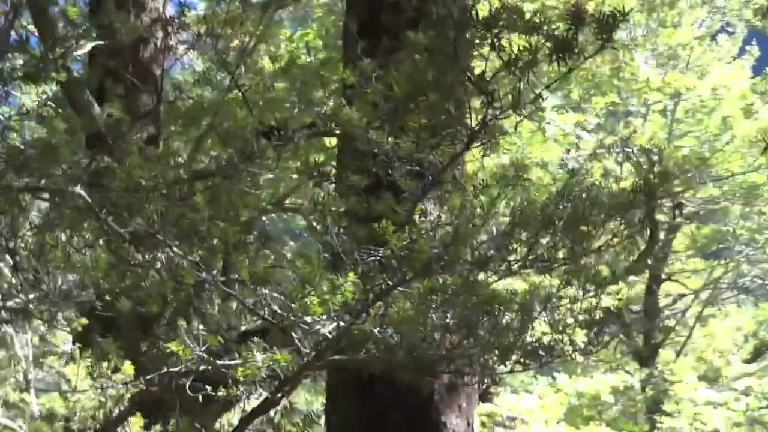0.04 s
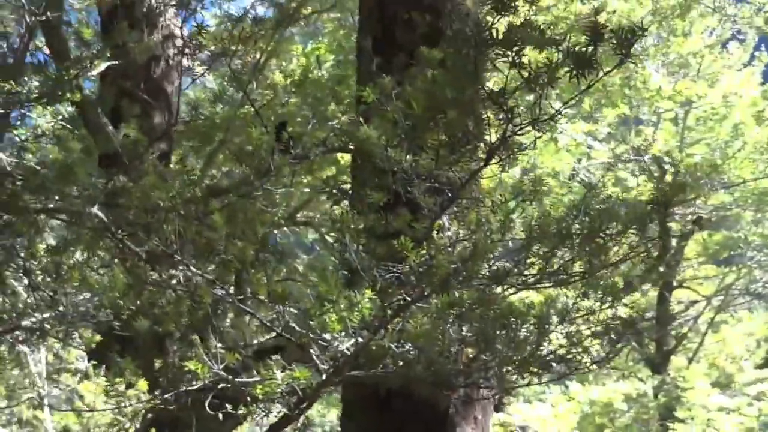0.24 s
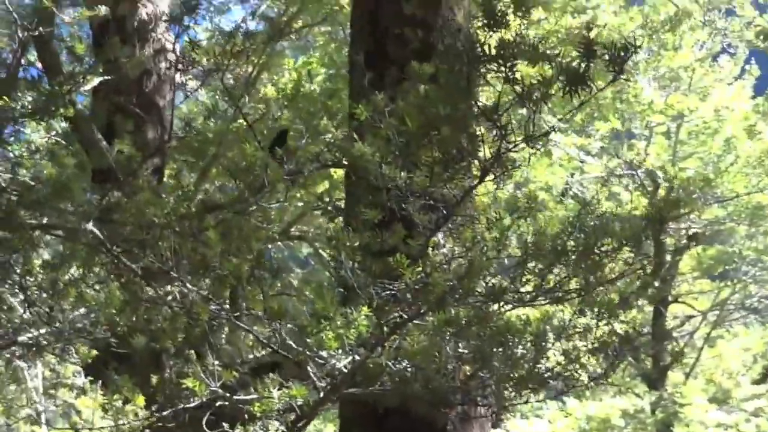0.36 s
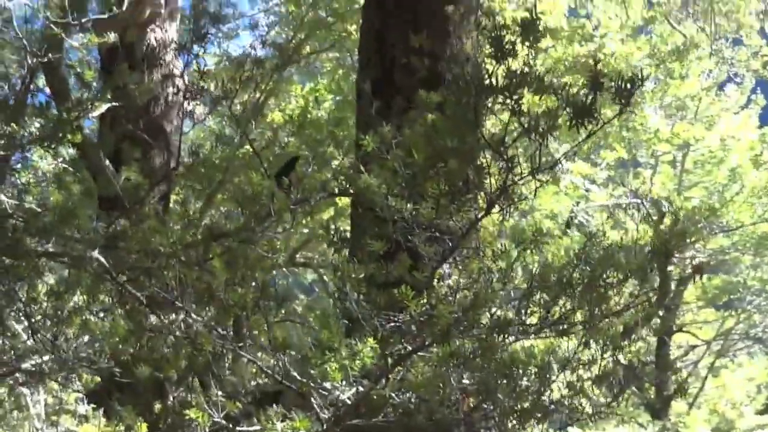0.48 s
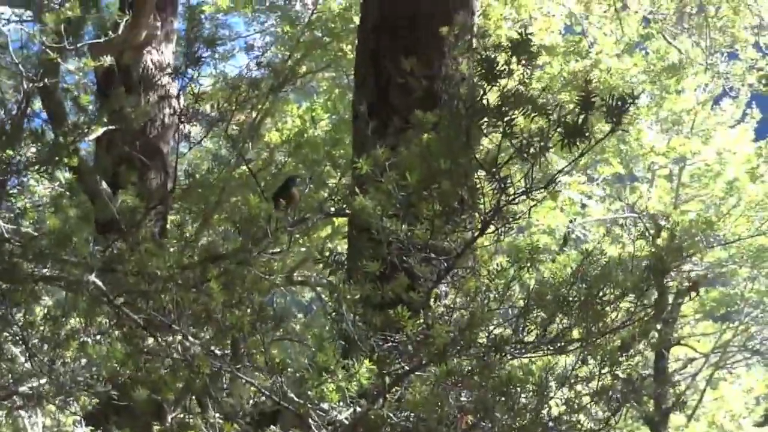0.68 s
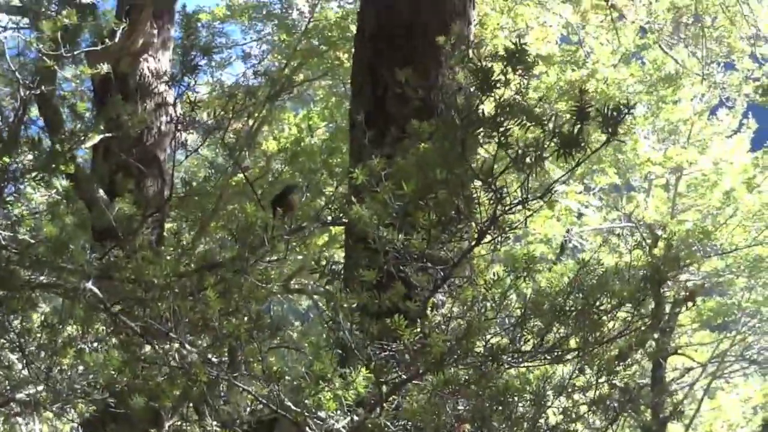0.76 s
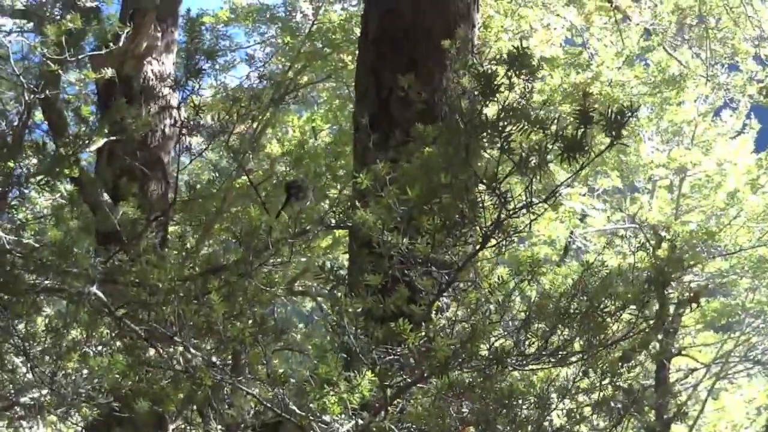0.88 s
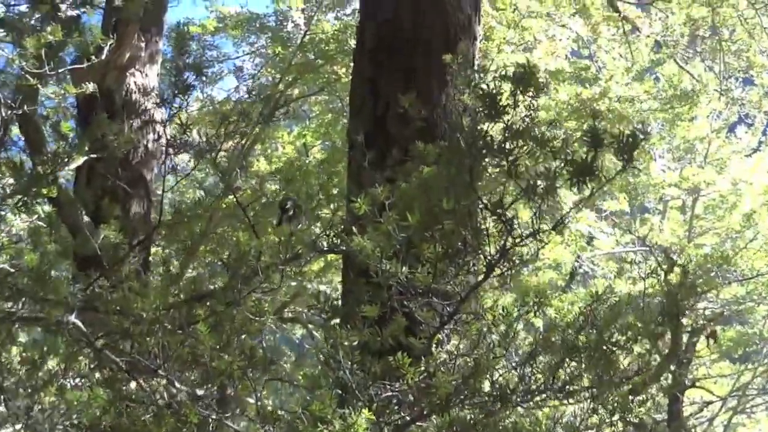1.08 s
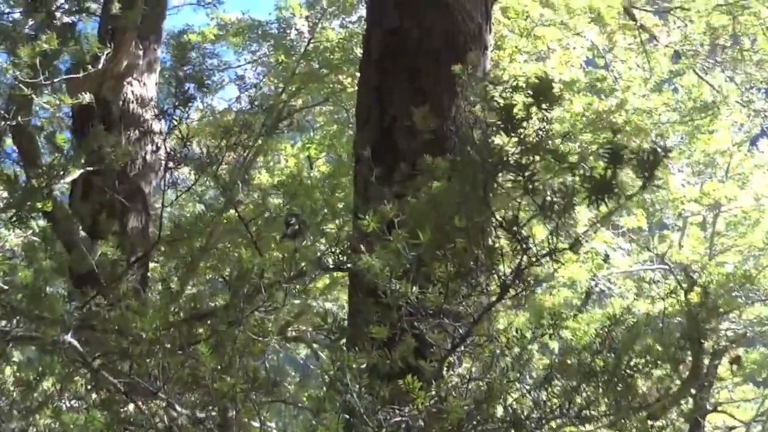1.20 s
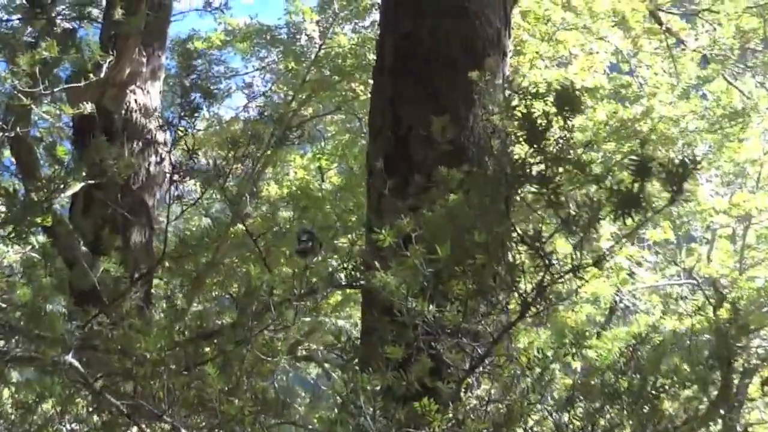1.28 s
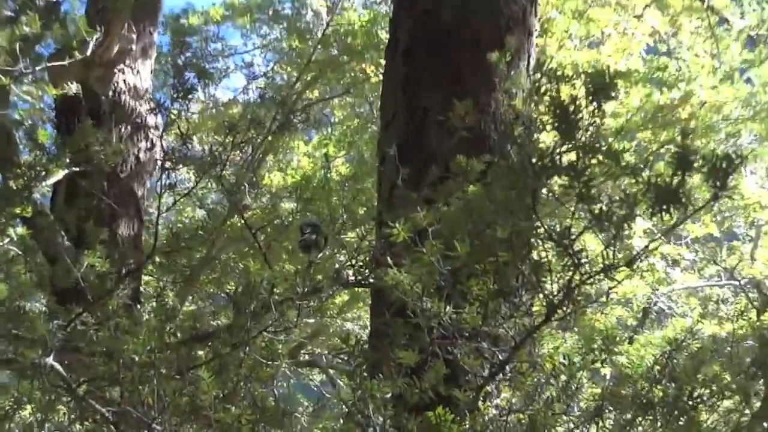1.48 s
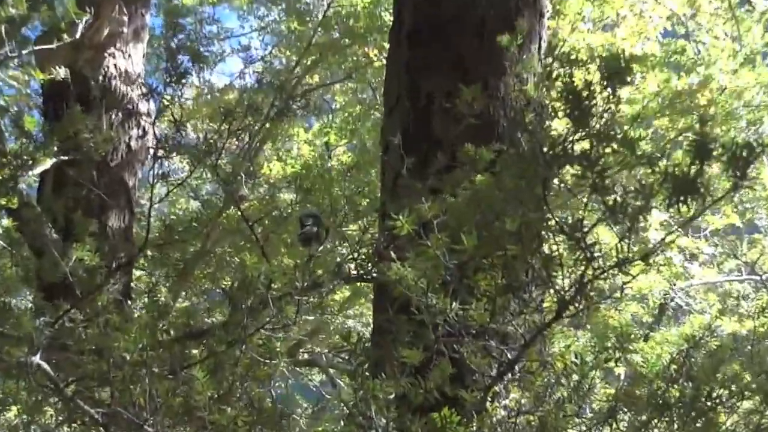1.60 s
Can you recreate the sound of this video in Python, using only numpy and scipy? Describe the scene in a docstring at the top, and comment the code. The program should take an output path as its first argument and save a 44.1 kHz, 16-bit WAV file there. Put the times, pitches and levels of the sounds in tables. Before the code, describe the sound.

A songbird gives a ringing whistle, a falling note, then a rough hiss in a forest.

```python
"""Songbird in a forest

A bird gives one bell-like whistle and a short falling note, both nearly pure tones, and a second later
a rough hiss of air shaped by its throat, over thin held tones. Trunks reflect and foliage scatters the
sound, and the reverberation of the phrase before is still decaying at the start. Behind it all are
faint high ticks, as of camera handling, and the soft steady rush of the forest."""
import sys
import numpy as np
from scipy import signal
from scipy.fft import rfft, irfft, next_fast_len
from scipy.io import wavfile
from scipy.ndimage import map_coordinates

SR = 44100
rng = np.random.default_rng(int(sys.argv[2]) if len(sys.argv) > 2 else 0)


def store_wav(level_fs):
    """Save 16-bit WAV to argv[1]."""
    pcm = np.round(np.clip(np.atleast_2d(level_fs), -1, 1) * 32767)
    wavfile.write(sys.argv[1], SR, pcm.T.astype(np.int16))


N = 72765
TIME = np.arange(N) / SR


def amp(db):
    """Amplitude ratio of a level in decibels."""
    return 10 ** (np.asarray(db) / 20)


def unit(x):
    """Normalisation to rms 1."""
    return x / np.sqrt(np.mean(x ** 2) + 1e-20)


def along(points, hz):
    """Interpolation of (frequency_hz, value) points on a logarithmic frequency axis."""
    return np.interp(np.log(hz + 1), np.log(np.array(points)[:, 0] + 1), np.array(points)[:, 1])


def wobble(rate):
    """Smooth random modulation with `rate` knots a second."""
    return map_coordinates(rng.standard_normal(N), [TIME * rate], mode="wrap")


def filtered(x, response):
    """Linear filtering: the spectrum is multiplied by a frequency response."""
    size = next_fast_len(N + SR // 2)
    return irfft(rfft(x, size) * response(np.fft.rfftfreq(size, 1 / SR)), size)[..., :N]


def noise(response):
    """White noise coloured by a frequency response, at rms 1."""
    return unit(filtered(rng.standard_normal(N), response))


def band_noise(centre_hz, width_hz):
    """Band-pass noise of rms 1."""
    return noise(lambda hz: 1 / (1 + (2 * (hz - centre_hz) / width_hz) ** 4))


def pulse(centre_s, width_s):
    """A Gaussian envelope of height 1."""
    return np.exp(-((TIME - centre_s) / width_s) ** 2)


def swell(start_s, attack_s, end_s, release_s):
    """An envelope of rounded attack, hold and release."""
    rise = np.sin(np.pi / 2 * np.clip((TIME - start_s) / attack_s, 0, 1)) ** 2
    return rise * np.exp(-2 * (np.maximum(TIME - end_s, 0) / release_s) ** 1.6)


def whistle(contour, jitter):
    """Phase, the integral of frequency, and amplitude of a tone that follows a contour."""
    times, hz, db = np.transpose(contour)
    pitch = np.interp(TIME, times, hz) * (1 + jitter * wobble(500))
    level = np.sqrt(2) * amp(np.interp(TIME, times, db, left=-120, right=-120))
    return 2 * np.pi * np.cumsum(pitch) / SR, level


# Spectrum of the rush: frequency_hz, gain_db
RUSH_SPECTRUM = [(15, -78), (25, -45.5), (120, -25.5), (200, -16.5), (299, -8), (392, -6.5), (637, -1.5),
                 (749, -3), (929, -2), (1150, -5), (1320, -3.5), (1590, -5), (1730, -5), (2590, -8),
                 (3490, -10), (5370, -15.5), (9210, -27.5), (13100, -38), (15800, -39.5)]
# Its slow swell: time_s, level_db
RUSH_LEVEL = [(0, -44), (.45, -43.5), (.8, -42), (1.2, -41), (1.65, -41.5)]
# Its side signal relative to the mid: frequency_hz, gain_db
RUSH_WIDTH = [(30, -6), (120, -16.5), (600, -17.5), (1500, -14.5), (4000, -13.5), (12000, -26)]
def forest_rush():
    """Ambient noise: a distant rush, thin in the bass and largely coherent between left and right."""
    shelf_hz, pan_db = 75, .5
    colour = lambda hz: (amp(along(RUSH_SPECTRUM, hz))
                         * (hz ** 2 + shelf_hz ** 2 / 2) / (hz ** 2 + shelf_hz ** 2))
    mid = noise(colour)
    side = filtered(noise(colour), lambda hz: amp(along(RUSH_WIDTH, hz)))
    level = amp(np.interp(TIME, *np.transpose(RUSH_LEVEL)) + 0.12 * wobble(12))
    return level * np.array([mid + side, mid - side]) * amp([[-pan_db], [pan_db]])


# Faint high ticks, as of camera handling: start_s, relative_level_db
FAINT_TICKS = [(0.055, -43), (0.835, -49), (1.09, -44), (1.22, -46), (1.494, -39), (1.506, -30.5),
               (1.543, -40.5), (1.588, -45), (1.628, -46.5), (1.644, -45)]
def faint_ticks():
    """Damped transients: each tick is a burst of high noise that decays exponentially."""
    t60_s = .012
    level = sum((TIME >= start) * amp(db - 60 * np.abs(TIME - start) / t60_s)
                for start, db in FAINT_TICKS)
    return level / 2 * band_noise(centre_hz=9000, width_hz=9000)


# Echoes of the phrase before: centre_hz, width_hz, level_db, t60_s
LINGERING_BANDS = [(1218, 140, -41.5, 0.37), (1640, 40, -43, 0.26), (1785, 93, -40.5, 0.85),
                   (1980, 45, -44, 0.62), (3910, 120, -35.5, 0.24), (8030, 300, -48, 0.37),
                   (11900, 500, -62, .3)]
def lingering_echoes():
    """Reverberant decay: earlier notes persist as narrow bands of noise that fade exponentially."""
    return sum(amp(db - 60 * TIME / t60) * band_noise(hz, width)
               for hz, width, db, t60 in LINGERING_BANDS)


# Reverberation time of the foliage: frequency_hz, t60_s
FOLIAGE_DECAY = [(1000, .42), (4000, 0.78), (12000, .36)]
def foliage_scatter(x):
    """Diffuse scattering: near branches give a short tail of echoes, the foliage a longer one."""
    near_t60_s, near_db, far_db, gap_s = 0.17, -18, -16.5, .008
    hz, age, spectra = signal.stft(rng.standard_normal((2, SR * 3 // 4)), SR, nperseg=256)
    far_t60_s = along(FOLIAGE_DECAY, hz)[:, None]
    near = signal.istft(spectra[0] * amp(-60 * age / near_t60_s), SR, nperseg=256)[1]
    far = signal.istft(spectra[1] * amp(-60 * age / far_t60_s), SR, nperseg=256)[1]
    tail = amp(near_db) * near / np.linalg.norm(near) + amp(far_db) * far / np.linalg.norm(far)
    return signal.fftconvolve(x, np.pad(tail, (int(gap_s * SR), 0)))[:N]


# Reflections from the nearest trunks: delay_s, gain_db
TRUNK_REFLECTIONS = [(.0105, -11), (.019, -18.5), (.056, -26.5)]
def trunk_echoes(x):
    """Early reflection: each trunk returns a delayed, weaker copy of the sound."""
    return filtered(x, lambda hz: sum(amp(db) * np.exp(-2j * np.pi * hz * delay)
                                      for delay, db in TRUNK_REFLECTIONS))


# Partials of the bell note among the trees: pitch_hz, level_db, late_t60_s
RING_PARTIALS = [(3814, -18, 0.58), (7750, -38, .5), (11540, -45, .4), (15300, -57, .4)]
def bell_reverberation():
    """Interference of overlapping echoes: each partial flutters as it drops fast, then fades slowly."""
    start_s, rise_s, early_t60_s, late_db = .154, 0.0086, 0.2, -10
    flutter_db, flutter_rate, drift_rad = 2.7, 110, 0.44
    fundamental_hz = RING_PARTIALS[0][0]
    age = np.maximum(TIME - start_s - rise_s, 0)
    out = np.zeros(N)
    for hz, db, t60 in RING_PARTIALS:
        fade = np.hypot(amp(-60 * age / early_t60_s), amp(late_db - 60 * age / t60))
        phase = 2 * np.pi * hz * TIME + drift_rad * hz / fundamental_hz * wobble(flutter_rate)
        out += amp(db + flutter_db * wobble(flutter_rate)) * fade * np.sin(phase)
    return out * np.clip((TIME - start_s) / rise_s, 0, 1) ** 2


# Thin tones around the hiss: start_s, end_s, first_pitch_hz, last_pitch_hz, level_db, roughness
HELD_TONES = [(1.17, 1.277, 1622, 1618, -42, 0.31), (1.281, 1.457, 1615, 1566, -40, 0.43),
              (1.287, 1.453, 1705, 1690, -45, 0.6), (1.473, 1.515, 892, 867, -42.5, 0.28),
              (1.477, 1.523, 667, 637, -49, 0.4)]
def held_tones():
    """Beating: the two sides of the syrinx give close pitches that interfere where they overlap."""
    edge_s = 0.0044
    out = np.zeros(N)
    for start, end, first_hz, last_hz, db, roughness in HELD_TONES:
        phase = 2 * np.pi * np.cumsum(np.interp(TIME, [start, end], [first_hz, last_hz])) / SR
        tone = unit(np.sin(phase + roughness * wobble(120)) * (1 + roughness * wobble(150)))
        out += amp(db) * swell(start, edge_s, end, edge_s) * tone
    return out


# Spectrum of the air in the throat: frequency_hz, gain_db
THROAT_SPECTRUM = [(800, -16), (1250, 1.5), (1900, -3.5), (2400, -5), (3700, -3), (4600, -1.5), (5800, -2),
                   (7200, -7), (9000, -9.5), (12200, -12.5), (12900, -22), (15700, -32)]
# Spectrum of the jet: frequency_hz, gain_db
JET_SPECTRUM = [(1000, -35), (3500, -11.5), (4600, -7.5), (6500, -1), (8900, 0.5), (9800, -6), (12000, -12),
                (13000, -11), (15700, -14)]
# Narrow throat resonances, added to a flat response: centre_hz, width_hz, gain_db
THROAT_RESONANCES = [(1933, 79, 1.5), (4486, 150, 0.5), (5300, 260, -6.5), (5900, 130, -3),
                     (6570, 70, -1.5), (7340, 100, -5.5), (8350, 60, 3), (8880, 160, -7.5), (11300, 80, -4)]
def hiss():
    """Source and filter: rough air excites the throat, then a brighter jet joins as the bill opens."""
    def air(spectrum, low_cut_hz=1000):
        def response(hz):
            peaks = sum(amp(db) / (1 + (2 * (hz - centre) / width) ** 2)
                        for centre, width, db in THROAT_RESONANCES)
            return amp(along(spectrum, hz)) * (1 + peaks) * hz ** 3 / (hz ** 3 + low_cut_hz ** 3)
        return noise(response)

    throat = swell(start_s=1.238, attack_s=.046, end_s=1.355, release_s=.125) * air(THROAT_SPECTRUM)
    jet = swell(start_s=1.26, attack_s=.11, end_s=1.425, release_s=.088) * air(JET_SPECTRUM)
    roughness = amp(-0.9 * wobble(260))
    return (amp(-29.5) * throat + amp(-33.5) * jet) * roughness


# Contour of the falling note: time_s, pitch_hz, level_db
FALL_CONTOUR = [(.219, 1990, -55), (.228, 1907, -24.5), (.235, 1830, -16.5), (.242, 1663, -15.5),
                (.249, 1480, -24.5), (.256, 1169, -32), (.266, 1173, -29), (.28, 1171, -36),
                (.298, 1150, -53), (.36, 1140, -52)]
# Its overtones at their strongest: harmonic_number, relative_level_db
FALL_HARMONICS = [(2, -24), (3, -40.5), (6, -44), (7, -37), (8, -55.5)]
def falling_note():
    """Frequency glide: a tone slurs down and settles, with frayed harmonics in mid-fall."""
    phase, level = whistle(FALL_CONTOUR, jitter=0.0054)
    pressure = pulse(centre_s=.24, width_s=.009)
    fray_rad = .25
    overtones = sum(amp(db) * np.sin(k * (phase + fray_rad * wobble(500))) for k, db in FALL_HARMONICS)
    return level * np.sin(phase), level * pressure * overtones


# Contour of the bell note: time_s, pitch_hz, level_db
BELL_CONTOUR = [(.072, 3970, -56.5), (.089, 3875, -25.5), (.1, 3860, -16.5), (.113, 3792, -11),
                (.13, 3826, -10), (.143, 3807, -10.5), (.153, 3849, -11), (.159, 3894, -16.5),
                (.168, 3790, -42)]
# Its overtones under full pressure: harmonic_number, relative_level_db
BELL_HARMONICS = [(2, -26), (3, -22.5), (4, -36.5)]
# Rough tones between the harmonics as the voice cracks: frequency_ratio, relative_level_db
CRACK_PARTIALS = [(1.5, -49.5), (2.5, -40.5), (3.5, -48)]
def bell_note():
    """Nonlinear oscillation: under pressure a nearly pure whistle gains harmonics and briefly cracks."""
    rasp_db, flutter_db, relaxed_db, fray_rad = -32.5, 3, -14, 1.6
    phase, level = whistle(BELL_CONTOUR, jitter=0.0017)
    pressure = pulse(centre_s=0.1503, width_s=.014)
    rasp = amp(rasp_db) * pressure * noise(lambda hz: 1 / (1 + (hz / 700) ** 2))
    tone = level * np.sin(phase) * (1 + rasp)
    overtones = sum(amp(db + flutter_db * wobble(140)) * np.sin(k * phase) for k, db in BELL_HARMONICS)
    brightness = np.sqrt(level / level.max()) * amp(relaxed_db * (1 - pressure))
    crack = sum(amp(db) * np.sin(k * phase + fray_rad * wobble(900)) for k, db in CRACK_PARTIALS)
    crack *= pulse(centre_s=.151, width_s=0.0077)
    return tone, level * (brightness * overtones + crack)


# Side signal of the two whistled notes: frequency_hz, gain_db
BIRD_SIDE = [(1200, -24.5), (3800, -28)]
def scene():
    """Superposition: the bird straight ahead, its echoes and the forest's rush add in mid-side stereo."""
    bell, bell_overtones = bell_note()
    fall, fall_overtones = falling_note()
    voice = bell_overtones + fall + fall_overtones + held_tones() + hiss()
    into_foliage = voice + amp(-12) * bell + amp(1.5) * bell_overtones
    mid = bell + bell_reverberation() + voice + trunk_echoes(voice) + foliage_scatter(into_foliage)
    mid += lingering_echoes() + faint_ticks()
    # A side signal in quadrature gives left and right a small phase difference.
    side = filtered(bell + fall, lambda hz: 1j * amp(along(BIRD_SIDE, hz)))
    side += amp(-15) * foliage_scatter(fall)
    side += amp(-16) * (bell_reverberation() + lingering_echoes())
    return np.array([mid + side, mid - side]) + forest_rush()


def record(dry):
    """Band limiting: an ideal low-pass filter removes the highest treble."""
    return filtered(dry, lambda hz: hz < 15750)


dry = scene()
out = record(dry)
store_wav(out)
```